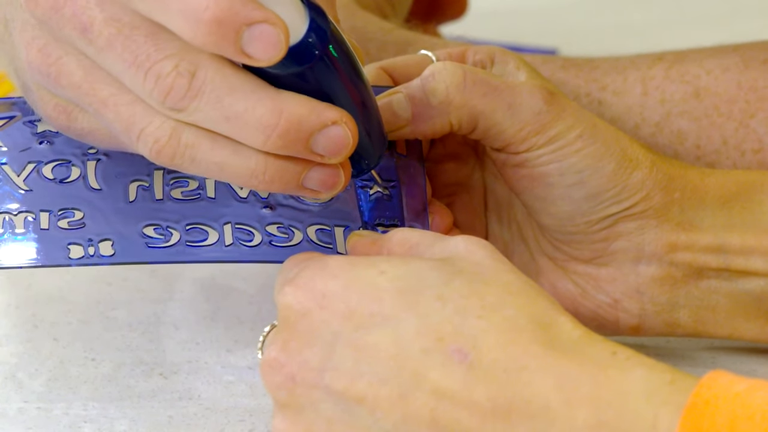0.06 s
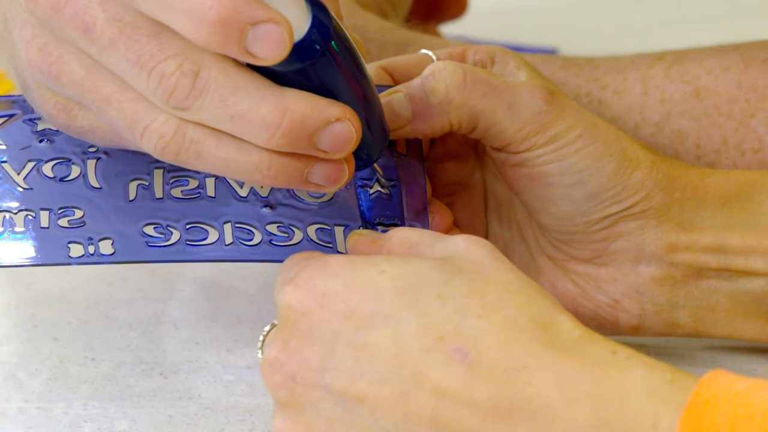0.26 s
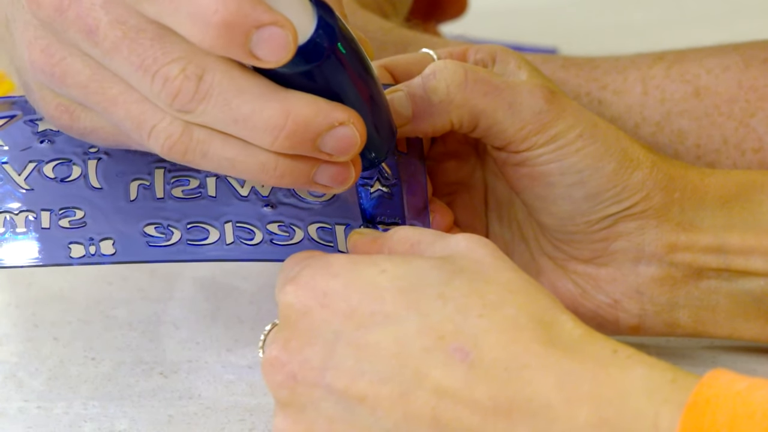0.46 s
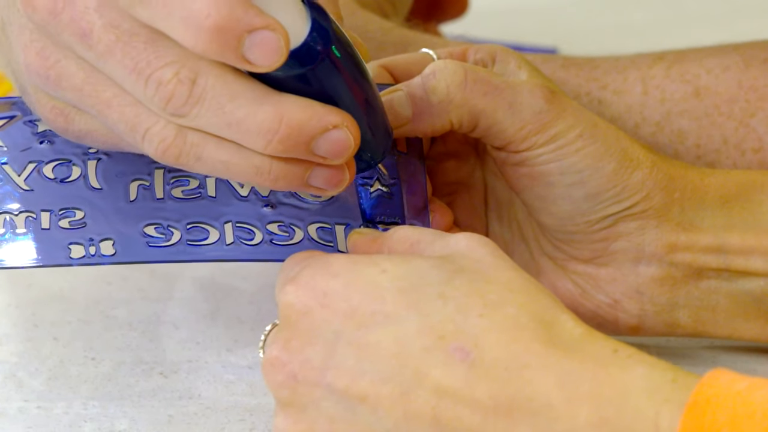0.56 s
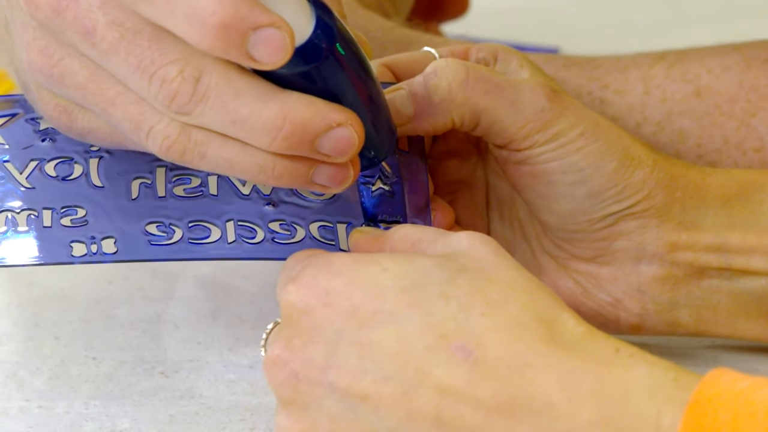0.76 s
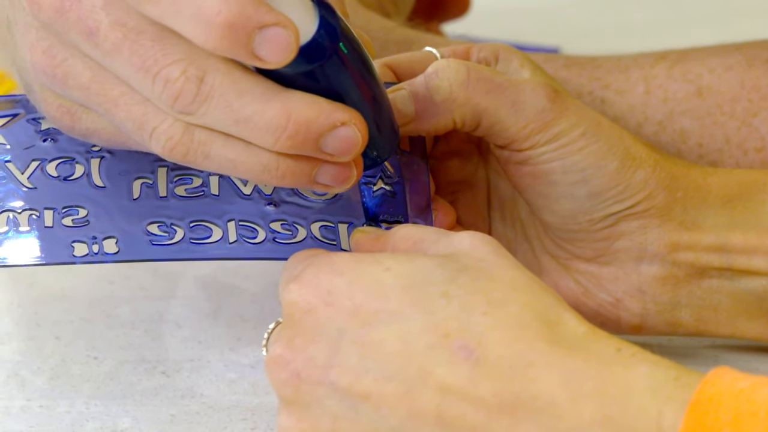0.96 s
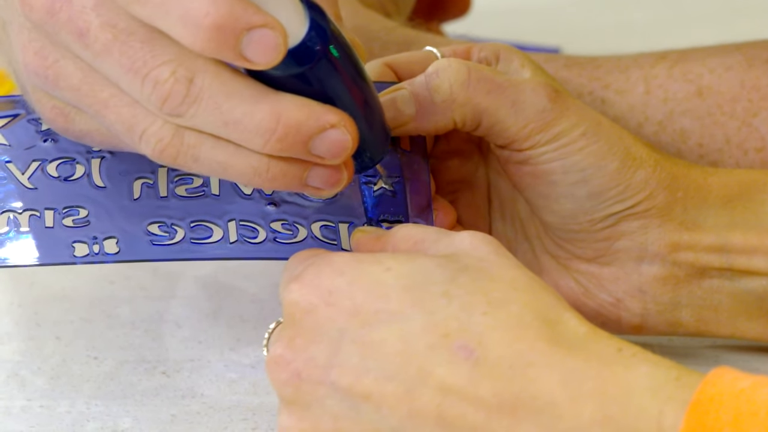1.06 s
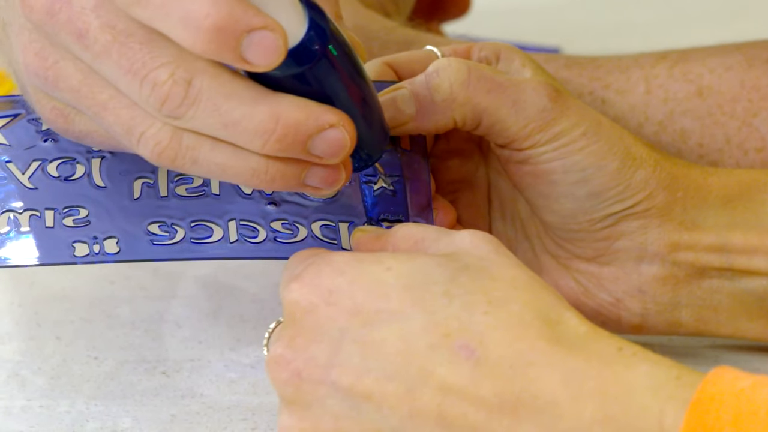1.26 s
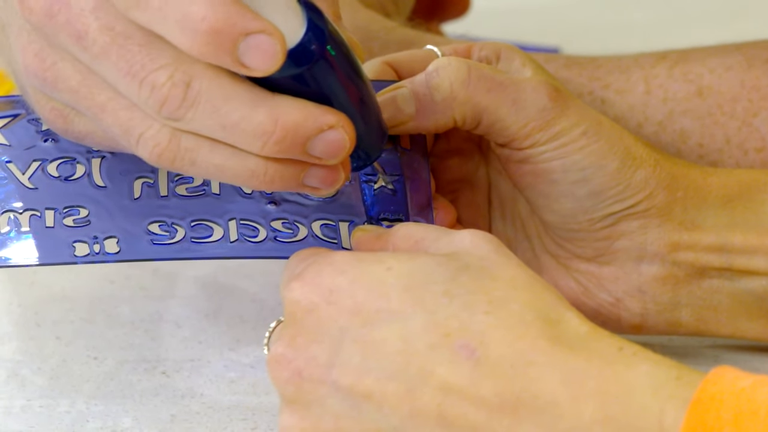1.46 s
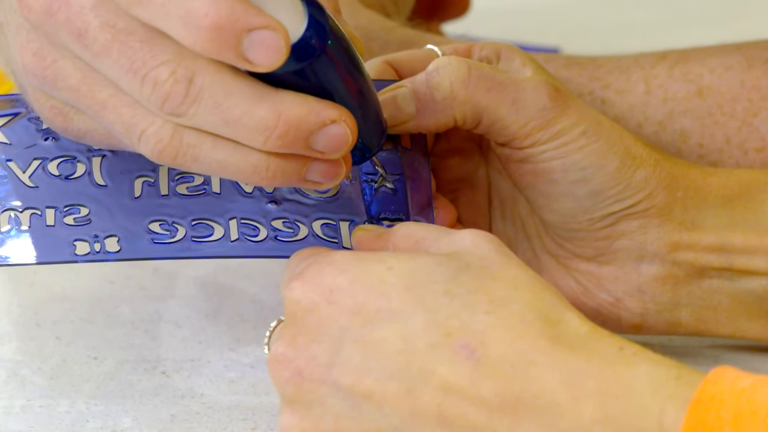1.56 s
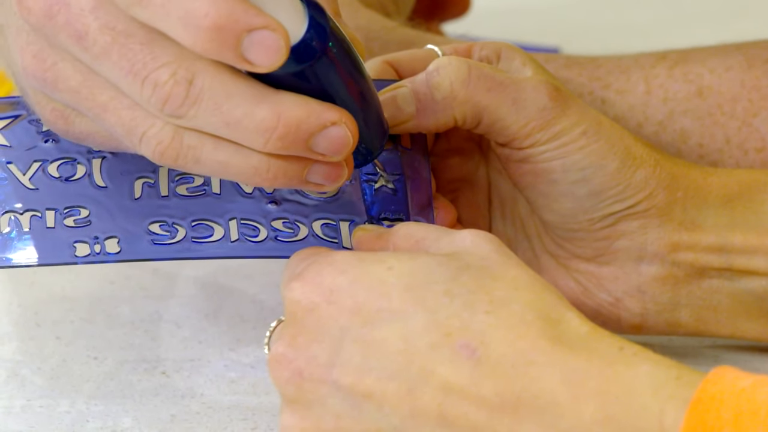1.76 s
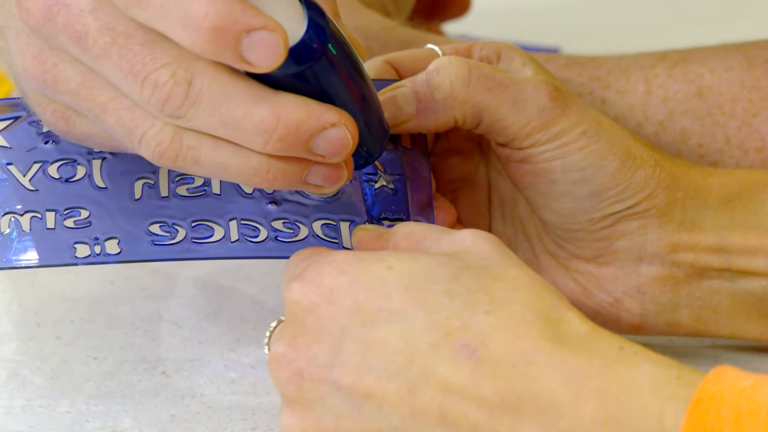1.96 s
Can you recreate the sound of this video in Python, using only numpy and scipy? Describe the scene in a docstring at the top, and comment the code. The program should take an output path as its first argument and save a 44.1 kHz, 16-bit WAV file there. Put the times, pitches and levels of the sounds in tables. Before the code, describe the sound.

A rotary engraving pen whines and buzzes without stopping, a high grinding hiss on top. Soon it presses into the workpiece in quick, rasping strokes with tiny chattering catches, and the motor sags slightly. Heard close up, indoors.

```python
"""Rotary engraving pen, close up

The pen cuts short strokes into a workpiece on a table. Its motor hums and its bearings rattle.
Skimming, the burr gives a bright, gritty whine; pressed in, it scrapes and the speed sags.
When it bites, it knocks on every turn. Small room, mono."""
import sys
import numpy as np
from scipy import signal
from scipy.fft import rfft, irfft, next_fast_len
from scipy.io import wavfile
from scipy.ndimage import map_coordinates

SR = 44100
rng = np.random.default_rng(int(sys.argv[2]) if len(sys.argv) > 2 else 0)


def dump_mix(stems):
    """Bounce the given channels to the path in sys.argv[1] as a 16-bit WAV at rate SR."""
    frames = np.atleast_2d(stems).T  # one column per channel
    limited = np.clip(frames, -1, 1)  # hard clip at full scale
    pcm = np.round(limited * 32767).astype(np.int16)
    wavfile.write(sys.argv[1], SR, pcm)


N = 89258

# shaft speed: t/s, f/Hz
SHAFT_HZ = [(0, 245), (.05, 251.2), (.24, 242.7), (.27, 239.6), (.39, 241.9), (.48, 236.8), (.6, 235.8),
            (.65, 240.1), (.72, 215.7), (.77, 210.4), (.86, 229.6), (.92, 206.8), (.96, 203.7),
            (1.06, 222.2), (1.09, 232), (1.16, 213), (1.19, 208.8), (1.23, 213.9), (1.29, 231.6),
            (1.33, 228.7), (1.36, 209.8), (1.4, 198.1), (1.42, 195.8), (1.52, 220), (1.58, 210.1),
            (1.635, 186.4), (1.7, 205.7), (1.74, 216), (1.8, 191.5), (1.87, 183.5), (1.95, 205.8),
            (2.02, 205)]
# hum, shaft order 1: t/s, level/dB
HUM_FIRST_DB = [(0, -51.5), (.04, -54), (.15, -57.5), (.3, -62), (.34, -67.5), (.42, -60), (.6, -59.5),
                (.72, -58.5), (.96, -58.5), (1.02, -68), (1.09, -57), (1.22, -60.5), (1.33, -55),
                (1.44, -62), (1.5, -73), (1.55, -58.5), (1.79, -62), (1.87, -77), (1.96, -60.5)]
# hum, order 3, swelling between strokes: t/s, level/dB
HUM_THIRD_DB = [(0, -44), (.04, -60), (.22, -57), (.48, -60.5), (.54, -46.5), (.58, -56), (.75, -63),
                (.8, -56), (.89, -67), (1, -53.5), (1.16, -66), (1.3, -47.5), (1.35, -66), (1.51, -53),
                (1.55, -63), (1.71, -56), (1.78, -66), (1.83, -53.5), (1.94, -53), (2.02, -54)]
# other hum overtones: order, level/dB, change when pressed/dB
HUM_ORDERS = [(2, -56, -6), (4, -59, 2.5), (5, -54, -2.5), (6, -56.5, 0), (7, -58, 5)]
# bearing rattle: t/s, level/dB
RATTLE_LEVEL_DB = [(0, -37.5), (.2, -33.5), (.5, -34.5), (.61, -33.5), (.7, -34.5), (1.05, -35),
                   (1.2, -35.5), (1.5, -36.5), (1.66, -37), (1.75, -35.5), (1.87, -34.5), (2.02, -34.5)]
# bearing whirr: t/s, level/dB re rattle
WHIRR_DB = [(0, -2), (.25, -3.5), (.45, -7.5), (.75, -7), (1, -6), (2.02, -6.5)]
# case response: f/Hz, level/dB
CASE_COLOUR = [(150, -28), (340, -20.5), (550, -20), (800, -14.5), (1250, -8.5), (1500, -13), (1750, -6.5),
               (2050, -1.5), (2500, -3.5), (2900, -6), (3300, -5), (4500, -14), (7000, -19), (10000, -31),
               (15000, -27)]
# case resonances: f/Hz, width/Hz, level/dB re colour
CASE_RESONANCES = [(1712, 30, -4), (2530, 130, -2), (3316, 50, -7), (5430, 140, -2)]
# pen whine: t/s, level/dB
WHINE_DB = [(0, -39), (.06, -38), (.2, -41), (.43, -42.5), (.53, -38), (.59, -44), (.65, -44.5), (.8, -42),
            (1, -41.5), (1.19, -44), (1.27, -41), (1.45, -40.5), (1.56, -39.5), (1.66, -45), (1.75, -41.5),
            (1.8, -46.5), (2.02, -43)]
# skirts of the whine: f/Hz, level/dB
WHINE_COLOUR = [(800, -18.5), (1600, -10.5), (2150, -3), (2600, 1), (2950, -5), (3300, -6.5), (3800, -8),
                (5000, -23.5)]
# loudest pen resonances: f/Hz, width/Hz, level/dB re colour
PEN_RESONANCES = [(2608, 114, 12.5), (3302, 50, 4)]
# gritty hiss: t/s, level/dB
GRIT_DB = [(0, -41.5), (.04, -39.5), (.2, -42.5), (.37, -42.5), (.4, -37.5), (.47, -37), (.6, -44.5),
           (.67, -36.5), (.78, -43), (.81, -36), (.84, -41), (.87, -38), (.98, -39.5), (1.06, -41),
           (1.1, -36), (1.2, -44), (1.26, -39), (1.33, -38.5), (1.44, -41), (1.53, -37.5), (1.66, -44),
           (1.76, -38), (1.83, -45), (1.9, -44.5), (1.98, -40)]
# grit spectrum: f/Hz, level/dB
GRIT_COLOUR = [(400, -27.5), (1300, -11.5), (2000, -1), (4700, -4), (6800, -0.5), (8700, -5), (10600, -4.5),
               (15000, -7)]
# workpiece resonances: f/Hz, width/Hz, level/dB re colour
WORKPIECE_RESONANCES = [(5380, 204, 0.5), (6800, 120, -1), (7370, 130, -8.5), (7980, 217, -2.5),
                        (9730, 150, 6)]
# grinding contact, drives the sizzle: t/s, level/dB
CONTACT_DB = [(0.0, -45), (0.02, -36.5), (0.06, -35.5), (0.08, -40), (0.24, -38.5), (0.28, -41),
              (0.31, -35), (0.36, -38), (0.51, -35.5), (0.6, -44), (0.63, -37.5), (0.68, -34), (0.78, -42),
              (0.805, -28), (0.85, -39.5), (0.87, -31), (0.9, -40.5), (0.96, -33), (0.97, -42.5),
              (0.98, -33.5), (1.06, -36.5), (1.07, -38), (1.09, -34), (1.21, -43.5), (1.245, -31.8),
              (1.28, -38), (1.34, -34.5), (1.35, -43), (1.38, -32), (1.4, -44.5), (1.42, -35), (1.43, -43),
              (1.515, -31), (1.57, -45), (1.61, -36), (1.66, -48), (1.71, -35), (1.72, -36), (1.77, -29.5),
              (1.81, -50), (1.85, -42.5), (1.88, -48), (1.93, -42), (1.95, -30.5), (1.96, -38.5),
              (2.02, -38)]
# sizzle spectrum: f/Hz, level/dB
SIZZLE_COLOUR = [(2000, -26.5), (7000, -10), (10500, -16), (11500, -4.5), (12400, 1), (13500, 0),
                 (15000, 1)]
# burr resonances: f/Hz, width/Hz, level/dB re colour
BURR_RESONANCES = [(11440, 80, 10.5), (11930, 140, 9), (13065, 51, -1.5), (13600, 100, -5),
                   (14170, 167, -2.5), (14826, 60, -10)]
# room background: f/Hz, level/dB
FLOOR_COLOUR = [(20, -15), (40, -4.5), (60, -3), (85, 2.5), (100, -7), (135, -7.5), (155, -7.5),
                (180, -5.5), (400, -9.5), (560, -7.5), (1000, -2), (5000, -29)]
# burr catching: t/s, length/s, level/dB, rebound/dB re knock
BITE_EVENTS = [(0.527, 0.0089, -34, 2), (0.652, 0.026, -34.5, -4.5), (1.135, 0.0234, -37, 0),
               (1.314, 0.013, -32.5, -6), (1.526, 0.0097, -29.5, -8), (1.545, 0.025, -34, 2),
               (1.574, 0.027, -39.5, -2), (1.969, 0.023, -42.5, -5)]
# knock spectrum: f/Hz, level/dB
KNOCK_COLOUR = [(200, -30), (900, -27), (1300, -15), (1700, -14), (2050, 2), (2300, 0), (2600, -1),
                (2850, -5), (3100, -1.5), (3600, -24), (5000, -17), (15000, -28)]
# cutting strokes: t/s, length/s, scrape level/dB, buzz level/dB
STROKE_EVENTS = [(0.654, .105, -37.5, -42.5), (0.862, 0.084, -36, -43.5), (1.1, 0.052, -40.5, -42.5),
                 (1.315, 0.04, -37.5, -40.5), (1.523, 0.08, -42, -54), (1.744, 0.03, -41, -44.5),
                 (1.956, 0.054, -44.5, -45)]
# scrape spectrum: f/Hz, level/dB
SCRAPE_COLOUR = [(230, -23.5), (540, -24.5), (850, -12), (1050, -17), (1350, -10), (1600, -9), (2150, 3),
                 (2700, -1.5), (3200, -2.5), (3700, -5), (4400, -6.5), (4900, -21), (8000, -22),
                 (15000, -28)]
# nasal workpiece buzz: f/Hz, level/dB
BUZZ_COLOUR = [(600, -33), (1000, -12.5), (1300, -1.5), (1450, -3), (1750, -8), (2400, -27)]

STROKE_ATTACK_S, STROKE_RELEASE_S = 0.012, 0.0334


def amp(db):
    """dB to gain."""
    return 10 ** (np.asarray(db) / 20)


def unit(x):
    """Scale to rms 1."""
    return x / np.sqrt(np.mean(x ** 2) + 1e-20)


def curve(rows):
    """(t/s, value) rows to one value per sample."""
    return np.interp(np.arange(N) / SR, *np.transpose(rows))


def wobble(rate_hz):
    """Smooth curve through random knots."""
    knots = rng.standard_normal(int(N * rate_hz / SR) + 4)
    return map_coordinates(knots, [np.arange(N) * rate_hz / SR], mode="nearest")


def gate(start_s, length_s, attack_s, release_s):
    """Rise, hold, decay; 0 to 1."""
    t = np.arange(N) / SR - start_s
    return np.clip(t / attack_s, 0, 1) * np.exp(-np.maximum(t - length_s, 0) / release_s)


def body(x, colour, resonances=()):
    """Minimum-phase colour filter plus resonances; output rms 1."""
    size = 2 * next_fast_len(N)
    f = np.fft.rfftfreq(size, 1 / SR)
    hz, db = np.transpose(colour)
    gain = amp(np.interp(np.log(f + 1), np.log(hz), db))
    cepstrum = irfft(np.log(gain))
    cepstrum[1:size // 2] *= 2  # fold to causal
    cepstrum[size // 2 + 1:] = 0
    ring = 1 + sum(amp(peak_db) * 1j * f * width_hz / (mode_hz ** 2 - f ** 2 + 1j * f * width_hz)
                   for mode_hz, width_hz, peak_db in resonances)
    return unit(irfft(rfft(x, size) * np.exp(rfft(cepstrum)) * ring)[:N])


def ticks(turns, angle_turns, jitter_s, scatter_db, max_turns=600):
    """One impulse per turn at a shaft angle, uneven in time and size."""
    count = min(int(turns[-1]), max_turns)
    timing, strength = rng.standard_normal((max_turns, 2))[:count].T
    centres = np.interp(np.arange(count) + angle_turns, turns, np.arange(N)) + jitter_s * SR * timing
    samples = np.floor(centres).astype(int)[:, None] + np.arange(-7, 9)
    offsets = samples - centres[:, None]
    shape = np.sinc(offsets) * np.sinc(offsets / 8)  # sub-sample placement
    pulses = shape * amp(scatter_db * strength[:, None])
    return np.bincount(np.clip(samples, 0, N - 1).ravel(), pulses.ravel(), N)


def scuff(turns, decay_turns):
    """Noise flaring once a turn; rms 1."""
    return unit(rng.standard_normal(N) * np.exp(-(turns % 1) / decay_turns))


def hum(turns, press, waver_db=3):
    """Motor tones at shaft orders; speed lifts the overtones, pressure shifts their balance."""
    def tone(order):
        return np.sqrt(2) * np.sin(2 * np.pi * (order * turns + rng.random()) + 0.5 * wobble(60))

    overtones = sum(amp(db + press_db * press + waver_db * (wobble(28) - 0.5)) * tone(order)
                    for order, db, press_db in HUM_ORDERS)
    first = amp(curve(HUM_FIRST_DB) + 2 * wobble(40)) * tone(1)
    third = amp(curve(HUM_THIRD_DB) + 2 * wobble(44.97)) * tone(3)
    return first + third + unit(curve(SHAFT_HZ) ** 3) * overtones


def rattle(turns, press, taps_db=-7.5, press_db=-3):
    """Bearing play taps the case at drifting angles over a pulsing whirr; pressure damps both."""
    taps = unit(ticks(turns, 0, jitter_s=20e-6, scatter_db=2.5))
    for angle_turns in (0.23, 0.41, 0.66, 0.87):
        drifting = turns + 0.02 * wobble(10)
        taps += amp(-2) * unit(ticks(drifting, angle_turns, jitter_s=20e-6, scatter_db=2))
    tapping = amp(taps_db) * body(taps, CASE_COLOUR, CASE_RESONANCES)
    whirr = amp(curve(WHIRR_DB)) * body(scuff(turns, decay_turns=1), CASE_COLOUR, CASE_RESONANCES)
    return amp(curve(RATTLE_LEVEL_DB) + press_db * press) * (tapping + whirr)


def whine(turns):
    """Shaft pulses ring the pen; the overtone nearest each resonance sings and chatters."""
    pulses = ticks(turns + 0.01 * wobble(40), 0.12, jitter_s=18e-6, scatter_db=2)
    flutter_db = 1.8 * wobble(55)
    return amp(curve(WHINE_DB) + flutter_db) * body(pulses, WHINE_COLOUR, PEN_RESONANCES)


def grinding(turns, grains_per_s=16000, contact_ref_db=-36.5):
    """Dense grit impacts ring workpiece and burr; firmer contact adds bright sizzle."""
    grains = (rng.random((2, N)) < grains_per_s / SR) * rng.standard_normal((2, N))
    flicker_db = 1.34 * np.cos(2 * np.pi * turns) + 1.1 * wobble(400) + wobble(70)
    coarse, fine = grains * amp(flicker_db)
    hiss = amp(-4.5) * rng.standard_normal(N)
    grit = body(unit(coarse) + hiss, GRIT_COLOUR, WORKPIECE_RESONANCES)
    sizzle = body(fine, SIZZLE_COLOUR, BURR_RESONANCES)
    sizzle_db = -35.5 + 1.21 * (curve(CONTACT_DB) - contact_ref_db)
    return amp(curve(GRIT_DB)) * grit + amp(sizzle_db) * sizzle


def background(level_db=-57):
    """Steady, dull room noise."""
    return amp(level_db) * body(rng.standard_normal(N), FLOOR_COLOUR)


def bites(turns, rebound_turns=0.421):
    """The caught burr knocks and rebounds once a turn."""
    knock, rebound = (body(ticks(turns, angle_turns, jitter_s=28e-6, scatter_db=1.6), KNOCK_COLOUR)
                      for angle_turns in (0, rebound_turns))
    out = np.zeros(N)
    for start_s, length_s, db, rebound_db in BITE_EVENTS:
        envelope = gate(start_s, length_s, attack_s=0.00805, release_s=0.0033)
        out += amp(db) * envelope * unit(knock + amp(rebound_db) * rebound)
    return out


def scraping(turns):
    """The pressed burr drags its high spots through the groove and shakes the workpiece."""
    drag = amp(-5) * scuff(turns, decay_turns=0.59)
    drag += unit(ticks(turns, 0, jitter_s=20e-6, scatter_db=1.5))
    for angle_turns in (0.29, 0.76):
        drifting = turns + 0.025 * wobble(22)
        drag += amp(-3) * unit(ticks(drifting, angle_turns, jitter_s=15e-6, scatter_db=2))
    scrape = body(drag, SCRAPE_COLOUR)
    buzz = body(ticks(turns, 0.497, jitter_s=30e-6, scatter_db=2.26), BUZZ_COLOUR)
    out = np.zeros(N)
    for start_s, length_s, scrape_db, buzz_db in STROKE_EVENTS:
        envelope = gate(start_s, length_s, STROKE_ATTACK_S, STROKE_RELEASE_S)
        out += envelope * (amp(scrape_db) * scrape + amp(buzz_db) * buzz)
    return out


def room(x, early_t60_s=0.0085, early_db=-14, tail_t60_s=0.15, tail_db=-12.5):
    """Adds quick reflections from table and hands, then a short tail."""
    t = np.arange(SR // 3) / SR
    early = rng.standard_normal(len(t)) * amp(-60 * t / early_t60_s)
    tail = rng.standard_normal(len(t)) * amp(-60 * t / tail_t60_s) * (t > 0.004)
    response = amp(early_db) * early / np.linalg.norm(early) + amp(tail_db) * tail / np.linalg.norm(tail)
    return x + signal.fftconvolve(x, response)[:N]


def scene():
    """Shaft rotation and hand pressure drive the pen; two identical channels."""
    turns = np.cumsum(curve(SHAFT_HZ)) / SR
    press = sum(gate(start_s, length_s, STROKE_ATTACK_S, STROKE_RELEASE_S)
                for start_s, length_s, *_ in STROKE_EVENTS)
    motor = hum(turns, press)
    engraving = rattle(turns, press) + whine(turns) + scraping(turns) + bites(turns) + grinding(turns)
    mono = motor + room(engraving) + background()
    return np.array([mono, mono])


def record(dry, cutoff_hz=15060):
    """Brick-wall low-pass."""
    size = next_fast_len(N + SR // 2)
    passband = np.fft.rfftfreq(size, 1 / SR) < cutoff_hz
    return irfft(rfft(dry, size) * passband, size)[:, :N]


dry = scene()
out = record(dry)
dump_mix(out)
```